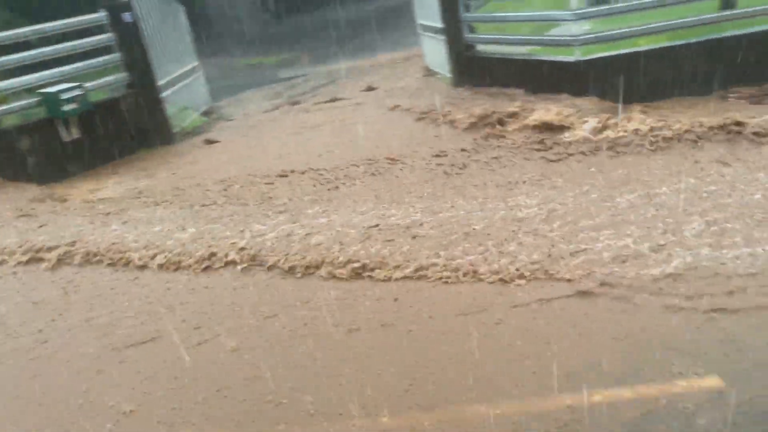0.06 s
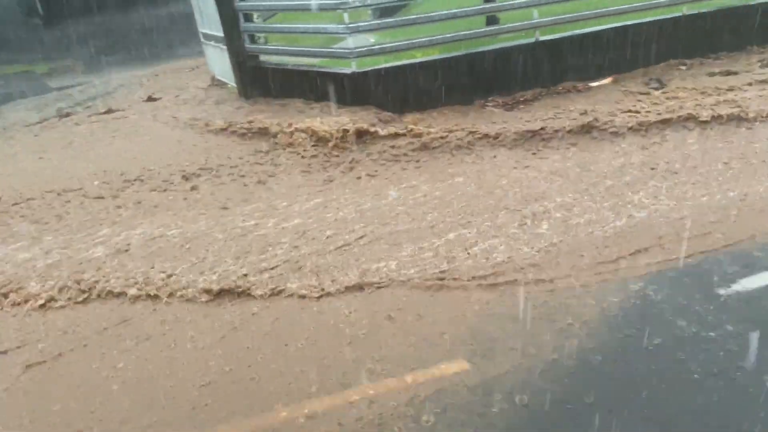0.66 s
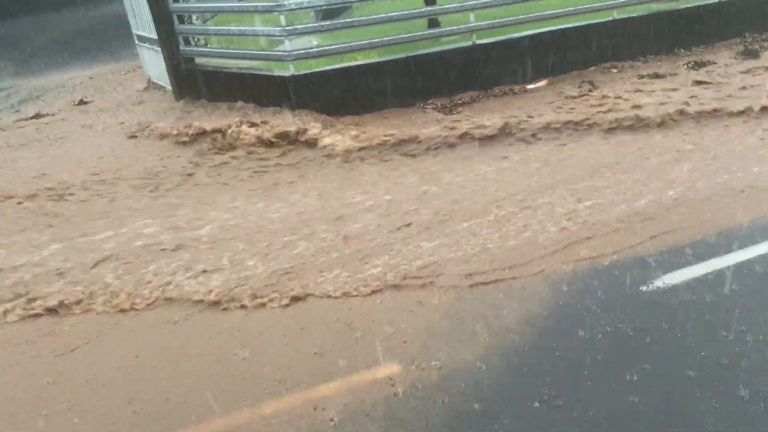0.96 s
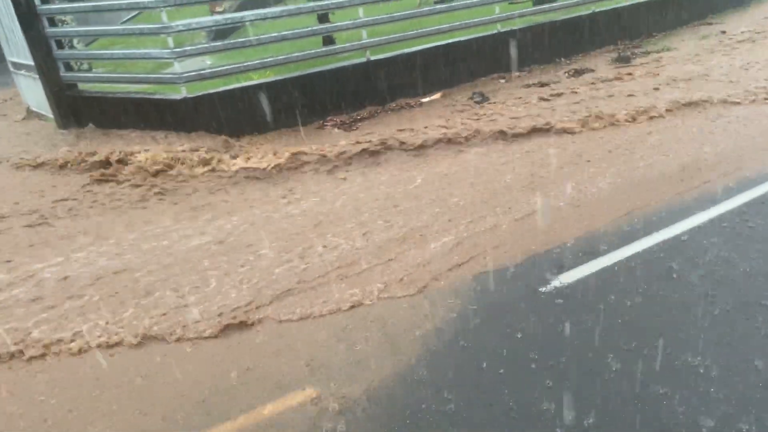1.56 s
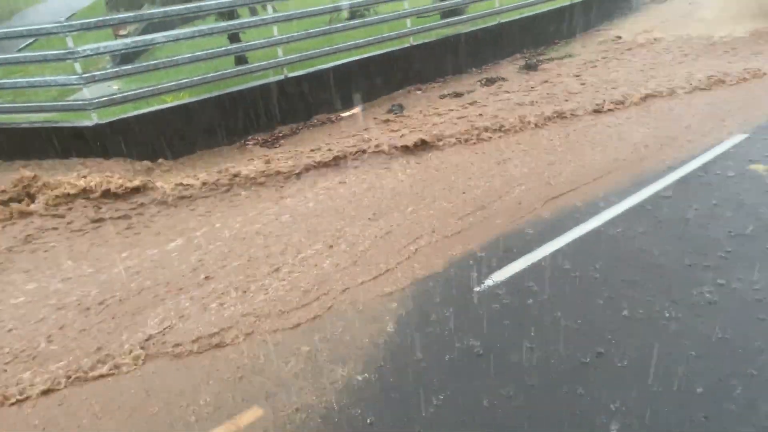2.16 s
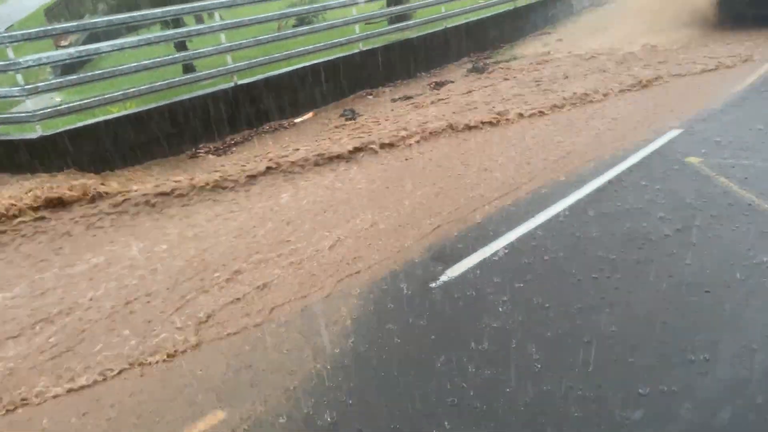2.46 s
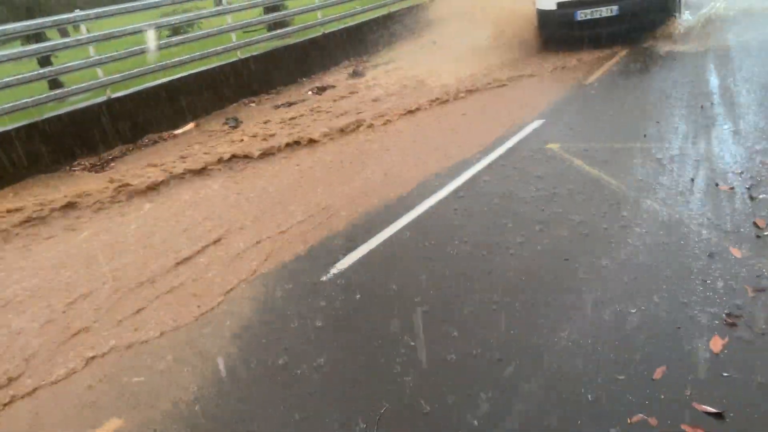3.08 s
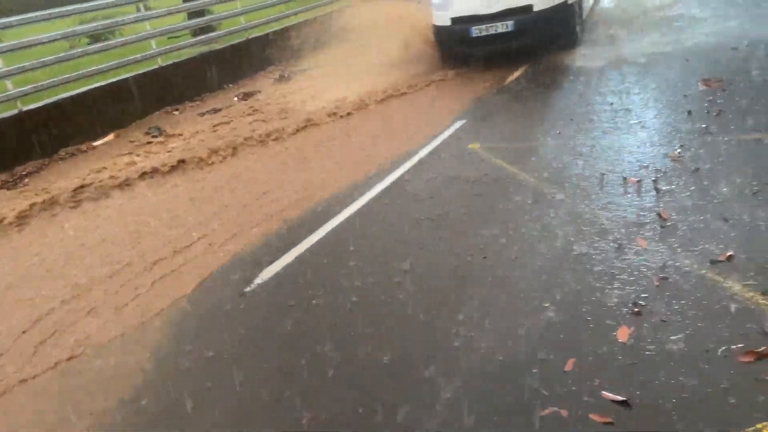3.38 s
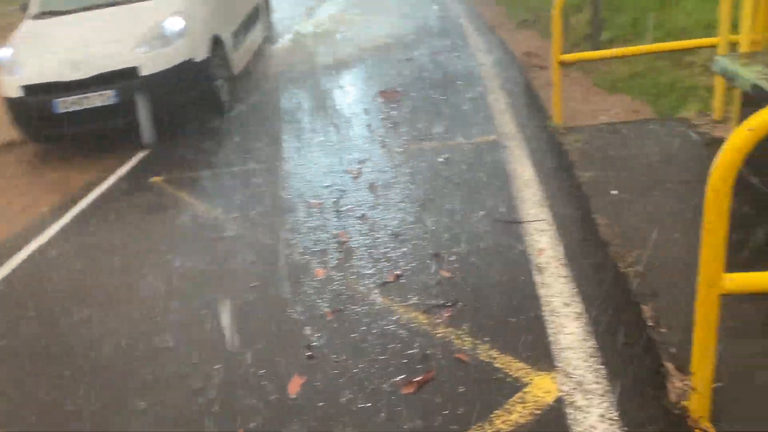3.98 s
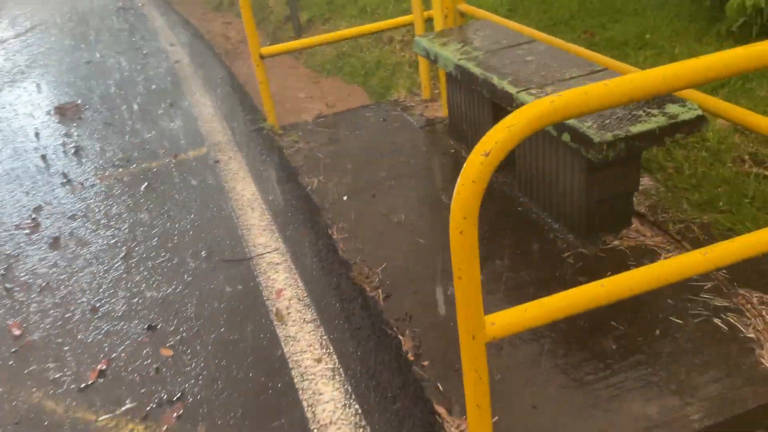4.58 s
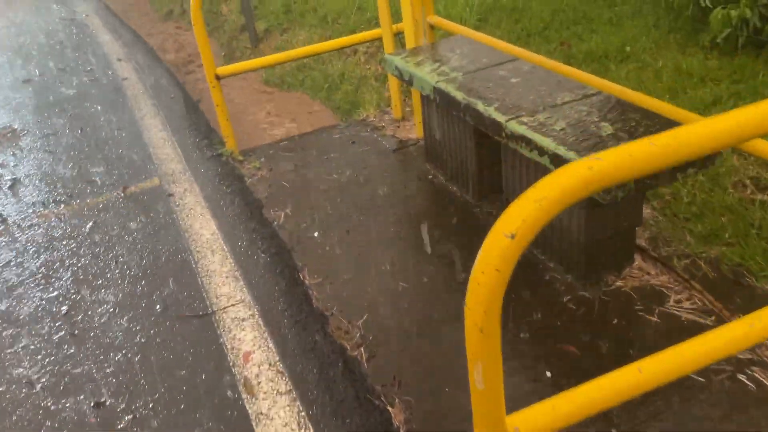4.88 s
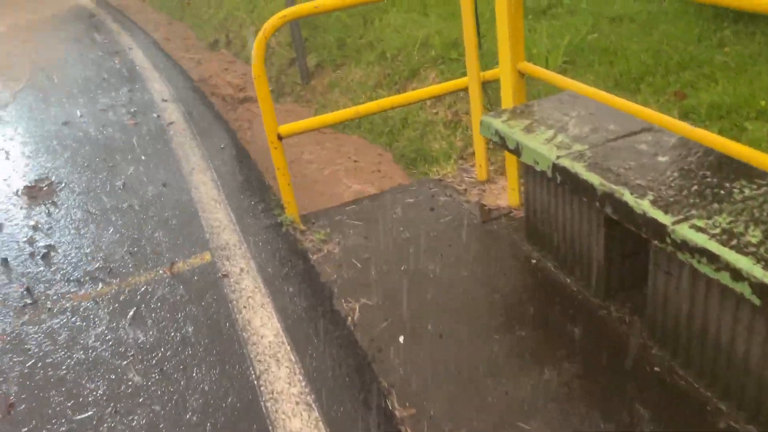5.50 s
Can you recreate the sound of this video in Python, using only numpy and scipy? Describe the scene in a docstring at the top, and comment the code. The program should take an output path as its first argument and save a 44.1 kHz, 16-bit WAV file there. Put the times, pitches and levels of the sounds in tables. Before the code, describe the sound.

From the start, floodwater rushes and churns across an outdoor road over a deep rumble, while heavy rain hisses steadily and single drops tick close by. A hollow gurgle bubbles up around 1.7 seconds and again near 3.4. Short sloshing slaps come between about 2.4 and 4.5 seconds as a van approaches, and its bow wave swells the water to a peak near 3.9 seconds, topped by a fine, bright spray. The engine's low growl passes at about 4.4 seconds, slightly left of centre. Fizzing tyre spray peaks around 4.7 seconds, with a shower of splattering droplets and a bubbly backwash that continues to the end. Near 5 seconds the exhaust drones, then drops in pitch and throbs as the van slows, with rain and water still running at about 5.6 seconds. Everything is heard in stereo from a phone at the roadside.

```python
"""Van wading through a flooded road

Muddy floodwater rushes, churns and gurgles over the asphalt while dense rain hisses and a few drops tick
close by. A van wades through: its bow wave swells the water, its tyres throw up spray, its engine drones
as it slows alongside, and a backwash follows. The water is patchy noise plus the damped rings of bubbles
and drops; the engine is a few wavering harmonics. Heard through a phone's two closely spaced microphones."""
import sys
import numpy as np
from scipy import signal
from scipy.fft import rfft, irfft, next_fast_len
from scipy.io import wavfile
from scipy.ndimage import uniform_filter1d, map_coordinates

SR = 44100
rng = np.random.default_rng(int(sys.argv[2]) if len(sys.argv) > 2 else 0)


def put_to_file(sound):
    """Save the sound as 16-bit audio at rate SR, in the file named by the first command-line argument."""
    columns = np.atleast_2d(sound).T  # one column per channel
    safe = np.clip(columns, -1, 1)
    whole_steps = np.round(safe * 32767)
    wavfile.write(sys.argv[1], SR, whole_steps.astype(np.int16))


N = 248706
BOW_WAVE_S = 3.92  # the van's bow wave is closest


def amp(db):
    """Decibels to gain."""
    return 10 ** (np.asarray(db) / 20)


def unit(x):
    """Scaled to rms 1."""
    return x / np.sqrt(np.mean(x ** 2) + 1e-20)


def along(points, hz):
    """Each column of a frequency table, read on a log axis."""
    freqs, *columns = np.transpose(points)
    return [np.interp(np.log(hz + 1), np.log(freqs + 1), column) for column in columns]


def wobble(rate):
    """A smooth random curve, rate knots a second."""
    return map_coordinates(rng.standard_normal(int(N * rate / SR) + 4), [np.arange(N) * rate / SR])


def swell(at_s, half_s):
    """A smooth hump of height 1 around at_s."""
    return np.exp(-((np.arange(N) / SR - at_s) / half_s) ** 2)


def nearness(closest_s, come_s, go_s):
    """Gain of a passing source, 1 / distance: 1 at its closest, 3 dB less come_s before and go_s after."""
    t = np.arange(N) / SR - closest_s
    return 1 / np.hypot(1, t / np.where(t < 0, come_s, go_s))


def filtered(x, response):
    """Shapes x with a complex frequency response."""
    size = next_fast_len(N + 8192)
    return irfft(rfft(x, size) * response(np.fft.rfftfreq(size, 1 / SR)), size)[..., :N]


def patchy(depth_db):
    """Two unrelated noises whose loudness drifts in patches of time and frequency."""
    noise = signal.stft(rng.standard_normal((2, N)), nperseg=512)[2]
    patches = uniform_filter1d(rng.standard_normal(noise.shape[1:]), size=4, axis=0)
    patches = uniform_filter1d(patches, size=12, axis=1)
    return unit(signal.istft(noise * amp(depth_db * unit(patches)), nperseg=512)[1][:, :N])


def grains(count, low_hz, high_hz, cycles, glide, spread_db, samples):
    """Two unrelated streams of damped rings that glide up as they die; spread_db makes a few stand out."""
    when, pitch, weight, side = rng.random((count, 4)).T[:, :, None]
    hz = low_hz * (high_hz / low_hz) ** pitch
    turns = hz * np.arange(samples) / SR
    age = turns / cycles
    strength = amp(-spread_db * np.log(weight + .01)) * hz
    ring = strength * np.exp(-3 * age) * np.sin(2 * np.pi * turns * (1 + glide * age / 2))
    at = (when * N).astype(int) + np.arange(samples) + (side > .5) * (N + samples)
    return unit(np.bincount(at.ravel(), ring.ravel(), 2 * (N + samples)).reshape(2, -1)[:, :N])


def surround(streams, spectrum):
    """Colours two unrelated streams and spreads them over the microphone pair; rms 1."""
    # stereo image of the pair: (frequency [Hz], left-right likeness [0-1], left over right [dB])
    image = [(60, .97, 1.5), (180, .92, 1.8), (320, .76, 1.5), (540, .24, 2.2), (950, .26, -.1),
             (1600, .02, -.8), (2400, .55, 0), (3100, .35, 1.8), (4800, .52, 4.8), (7000, .72, 1),
             (8200, .92, 0), (10000, .85, 0), (15000, .92, 0)]
    # phase between left and right, swinging round in the treble: (frequency [Hz], left lead [rad])
    lead = [(20, 0), (2000, 0), (3000, .4), (5000, .5), (6200, -.6), (8200, -3.1), (11700, -6.3),
            (15500, -9.8)]
    width = lambda hz: np.arccos(np.clip(along(image, hz)[0], -1, 1)) / 2
    colour = lambda hz: amp(along(spectrum, hz)[0]) * [np.cos(width(hz)), np.sin(width(hz))]
    mid, side = filtered(streams, colour)
    half = np.array([[.5], [-.5]])
    mics = lambda hz: amp(half * along(image, hz)[1]) * np.exp(1j * half * along(lead, hz)[0])
    return unit(filtered(np.array([mid + side, mid - side]), mics))


def just_left(mono):
    """Pans a sound slightly left of centre."""
    return mono * amp([[.7], [-.7]])


def flood():
    """Turbulent water: a deep rumble under churning and a bubbly rush, which the bow wave swells."""
    # colours of the three water layers: (frequency [Hz], level [dB])
    rumble_eq = [(15, -40), (30, -14), (42, -4), (60, 6), (80, -3), (110, -25), (250, -52)]
    churn_eq = [(45, -45), (80, -0.5), (105, -2), (140, -.5), (220, -0.2), (360, -3), (500, -6),
                (1000, -15), (3000, -41)]
    rush_eq = [(150, -48), (330, -2), (500, -2.5), (640, -0.3), (780, -0.7), (920, -0.5), (1120, -2.5),
               (1280, -4), (1700, -4.5), (2000, -7.5), (2400, -9.5), (2900, -11.5), (7000, -24)]
    # surges of the current: (time [s], churn boost [dB], rush boost [dB], half length [s])
    surges = [(.05, 3.5, 1.2, 0.24), (1.837, 1.5, 1, 0.42), (2.82, 0.5, 1.5, 0.15), (3.55, 1.5, .5, 0.083),
              (4.09, 2, 1, 0.18)]
    churn_surge_db = sum(db * swell(s, half_s) for s, db, _, half_s in surges)
    rush_surge_db = sum(db * swell(s, half_s) for s, _, db, half_s in surges)
    # the low churning is pushed along beside the van, so it lingers
    churn_db = -32 + 3.5 * nearness(3.75, come_s=1.26, go_s=.91) ** 2 + churn_surge_db
    rush_db = -28 + 2.5 * nearness(BOW_WAVE_S, come_s=1.23, go_s=.25) ** 2 + rush_surge_db
    bubbles = grains(4500, low_hz=256.7, high_hz=2796, cycles=22, glide=.054, spread_db=2, samples=1000)
    water = patchy(depth_db=1.16) + amp(-17.5) * bubbles
    rush = amp(rush_db + .33 * wobble(17)) * surround(water, rush_eq)
    churn = amp(churn_db + .39 * wobble(8.8)) * surround(patchy(depth_db=.37), churn_eq)
    rumble = amp(-41.5 + 1.2 * wobble(2.5)) * surround(rng.standard_normal((2, N)), rumble_eq)
    return rush + churn + rumble


def rain():
    """Far drops merge into a fluttering hiss, nearer ones patter; the bow wave's splashing lifts both."""
    # colour of the rain: (frequency [Hz], level [dB])
    hiss_eq = [(600, -20), (1500, 0), (2400, 3.5), (3100, 2), (4500, -.5), (6000, -1), (8500, -1.5),
               (10000, -2.6), (11700, -5.9), (15500, -7.5)]
    hiss_db = -31 + 2 * nearness(BOW_WAVE_S, come_s=1.36, go_s=.65) ** 2
    patter = grains(9000, low_hz=1960, high_hz=13600, cycles=3.9, glide=.065, spread_db=3.5, samples=128)
    return amp(hiss_db + .26 * wobble(20)) * surround(patchy(depth_db=1) + amp(-8.5) * patter, hiss_eq)


def gurgle():
    """Larger bubbles burst in clusters and give the rush a hollow gurgle."""
    # hollow colour of the bubbles: (frequency [Hz], level [dB])
    hollow_eq = [(450, -20), (780, 4), (1100, 1.5), (1800, -27)]
    # bubble clusters: (time [s], half length [s], level [dB])
    clusters = [(1.72, .3, -39), (2.4, .2, -53), (3.39, 0.066, -36), (3.9, .4, -48)]
    bubbles = grains(1900, low_hz=739, high_hz=1153, cycles=18, glide=.065, spread_db=0, samples=1400)
    envelope = amp(-43) + sum(amp(db) * swell(s, half_s) for s, half_s, db in clusters)
    return envelope * surround(bubbles, hollow_eq)


def booms(width_hz=43):
    """Deep, toneless swells of low rumble; the last thickens the engine's throb."""
    # swells of low rumble: (time [s], half length [s], level [dB], band centre [Hz])
    low_swells = [(.05, 0.35, -37, 75), (1.38, .25, -40, 58), (1.75, .2, -37, 160), (2.72, .12, -34, 78),
                  (3.17, 0.13, -39, 125), (3.5, 0.049, -35, 109), (4.107, .12, -33.5, 100),
                  (5.31, .06, -33, 125)]
    out = np.zeros(N)
    for s, half_s, db, centre_hz in low_swells:
        band = lambda hz: 1 / (1 + (2 * (hz - centre_hz) / width_hz) ** 4)
        out += amp(db) * swell(s, half_s) * unit(filtered(rng.standard_normal(N), band))
    return just_left(out)


def near_drops():
    """Each close drop is a plink that builds within a few cycles, with an overtone and a soft spatter."""
    # drops landing: (time [s], level [dB], pitch [Hz], left over right [dB], 60 dB decay [cycles])
    drops = [(.401, -21.5, 5300, 3, 20), (1.325, -22, 4900, 1, 12), (1.484, -22, 5700, 2, 13),
             (2.062, -24, 3600, 2, 13), (2.716, -23, 3950, 2, 14), (2.827, -24, 5300, 1, 10),
             (3.4712, -13.3, 5200, 5, 11), (3.965, -18.5, 2520, 0, 24), (3.9845, -21.5, 11700, 1, 16),
             (4.375, -22.5, 2900, 0, 24), (4.869, -23, 2400, 0, 22), (5.262, -21, 4750, 3, 18),
             (5.306, -24, 12000, 0, 16), (5.594, -23, 2700, 0, 18)]
    out, t = np.zeros((2, N + SR)), np.arange(SR // 20) / SR
    for s, db, hz, pan_db, cycles in drops:
        envelope = (1 - np.exp(-t * hz / 2)) * amp(-60 * t * hz / cycles)
        tone = np.sin(2 * np.pi * hz * t) + amp(-9) * np.sin(4 * np.pi * hz * t)
        tick = envelope / envelope.max() * tone
        spatter = rng.standard_normal(len(t)) * (amp(-15 - 60 * t / .003) + amp(-23 - 60 * t / .03))
        gains = amp(db + np.array([[pan_db], [-pan_db]]) / 2)
        out[:, round(s * SR):][:, :len(t)] += gains * (tick + spatter)
    wet_contact = signal.butter(4, [1500, 13000], "bandpass", fs=SR, output="sos")
    return signal.sosfilt(wet_contact, out[:, :N])


def sloshes(attack_s=.00045, decay_s=.03):
    """A wave slaps over and traps a pocket of air, which rings for a few cycles, rising in pitch."""
    # wave slaps: (time [s], level [dB], starting pitch [Hz])
    slaps = [(2.368, -15, 402), (2.512, -13, 271), (3.21, -17.5, 437), (3.529, -18, 343), (3.558, -15, 170),
             (4.226, -16.5, 184), (4.446, -13, 125)]
    out, t = np.zeros(N + SR), np.arange(SR // 12) / SR
    for s, db, hz in slaps:
        envelope = (1 - np.exp(-t / attack_s)) * amp(-60 * t / decay_s)
        gulp = envelope * np.sin(2 * np.pi * hz * t * (1 + 3 * t))
        out[round(s * SR):][:len(t)] += amp(db) * gulp
    return just_left(out[:N])


def mist():
    """The front wheels fling up a fine, bright spray."""
    # airy colour of the mist: (frequency [Hz], level [dB])
    mist_eq = [(3000, -20), (7000, -11), (10000, 7), (12500, -2), (15000, -14)]
    pass_by = amp(-41.5) * nearness(3.88, come_s=.27, go_s=.57) ** 2
    return pass_by * surround(patchy(depth_db=3), mist_eq)


def engine(uneven_db=3):
    """Uneven firings growl as the bonnet goes by, then drone from the rear-facing exhaust and slow."""
    # engine speed: (time [s], firing rate [Hz])
    firing = [(2.7, 69), (4.1, 66), (4.9, 69), (5.25, 57), (5.64, 56)]
    # throbs of the slowed, labouring engine: (time [s], level [dB])
    throbs = [(5.17, -33), (5.38, -31), (5.61, -25)]
    firing_hz = np.interp(np.arange(N) / SR, *np.transpose(firing))
    phase = 2 * np.pi * np.cumsum(firing_hz * (1 + .0305 * wobble(22))) / SR
    labouring = sum(amp(db) * swell(s, half_s=.062) for s, db in throbs)
    exhaust = amp(-33) * nearness(5.06, come_s=.39, go_s=.2) ** 2 + labouring
    second = amp(-9) * np.sin(2 * phase + .93 * wobble(35))
    third = amp(-16) * np.sin(3 * phase + 1.1 * wobble(35))
    drone = exhaust * unit(amp(uneven_db * wobble(38)) * (np.sin(phase) + second + third))
    # uneven cylinders add a growl on the third shaft order, 1.5 times the firing rate
    bonnet = nearness(4.38, come_s=.29, go_s=.47) * amp(-36 + 2.5 * wobble(30))
    growl = bonnet * unit(np.sin(1.5 * phase + .91 * wobble(40)))
    return just_left(drone + growl)


def tyre_spray(closest_s=4.67, come_s=.44, go_s=.24):
    """Water thrown up by the tyres: a far fizz that peaks as the wheels go by and leaves a steady wake."""
    # colour of the splashing: (frequency [Hz], level [dB])
    splash_eq = [(900, -13), (1750, -13), (2000, -4), (2250, 3.5), (2500, 0.5), (2750, -11), (4000, -5),
                 (9000, -20)]
    tyres = amp(-33) * nearness(closest_s, come_s, go_s) ** 2
    wake = amp(np.interp(np.arange(N) / SR, [closest_s - come_s, closest_s + go_s], [-42.5, -41]))
    envelope = np.hypot(tyres, wake) * amp(.67 * wobble(9.9))
    return envelope * surround(patchy(depth_db=1.8), splash_eq)


def tread_splatter(start_s=4.16, rise_s=.17, fade_db_per_s=1.5):
    """Water flung from the tyre grooves comes down as a shower of ringing plinks that slowly fades."""
    # colour of the plinks: (frequency [Hz], level [dB])
    plink_eq = [(1500, -15), (2150, -4), (2480, 2), (3200, -12)]
    t = np.arange(N) / SR - start_s
    shower = np.clip(t / rise_s, 0, 1) * amp(-fade_db_per_s * np.maximum(t, 0))
    plinks = grains(3600, low_hz=2167, high_hz=2590, cycles=62, glide=.03, spread_db=.2, samples=900)
    return amp(-37.5 + .3 * wobble(10)) * shower * surround(plinks, plink_eq)


def backwash(start_s=4.24, rise_s=.41):
    """Behind the van the parted water falls back and washes over the road, full of bubbles."""
    # colour of the wash: (frequency [Hz], level [dB])
    wash_eq = [(80, -14), (135, 12), (200, 1), (300, 10), (420, 5.5), (640, 9), (850, -12), (1150, 1.5),
               (1850, -2), (2350, -1), (2900, -5), (6000, -30)]
    fade_in = np.clip((np.arange(N) / SR - start_s) / rise_s, 0, 1)
    bubbles = grains(3000, low_hz=448, high_hz=2190, cycles=16, glide=.13, spread_db=3.5, samples=800)
    return amp(-34.5) * fade_in * surround(patchy(depth_db=3) + amp(-7.5) * bubbles, wash_eq)


def scene():
    """A bed of floodwater and rain, with the van passing through it."""
    bed = flood() + gurgle() + booms() + sloshes() + rain() + near_drops()
    van = engine() + tyre_spray() + mist() + tread_splatter() + backwash()
    return bed + van


def record(dry):
    """A steep low-pass removes everything above 14.6 kHz."""
    return filtered(dry, lambda hz: hz < 14600)


dry = scene()
out = record(dry)
put_to_file(out)
```